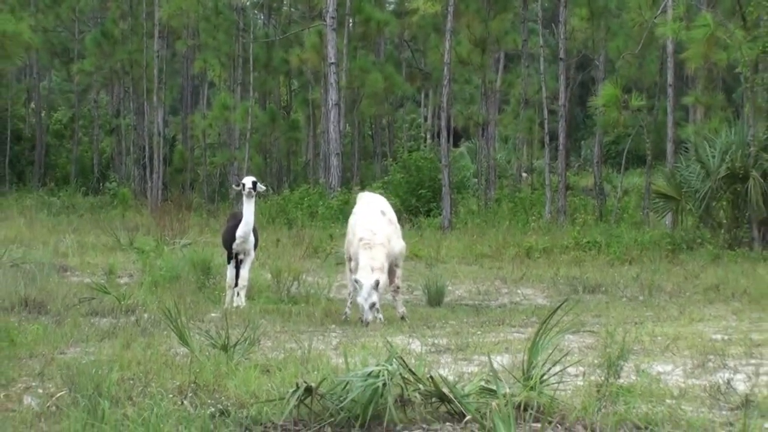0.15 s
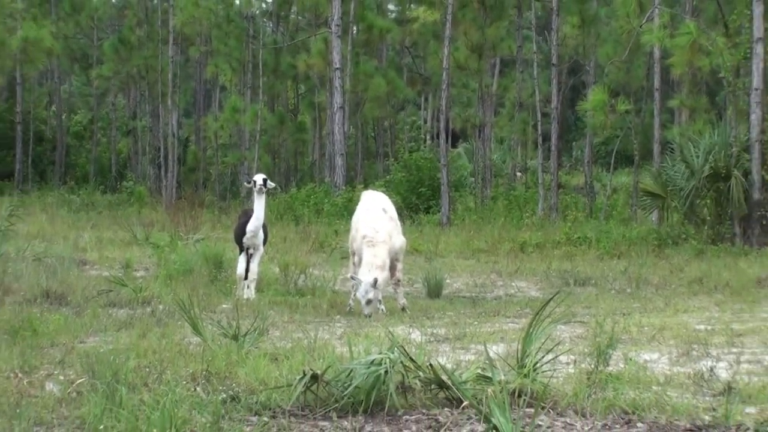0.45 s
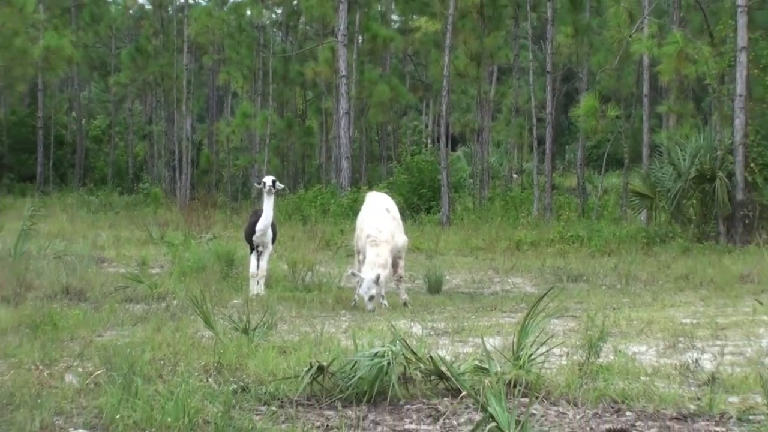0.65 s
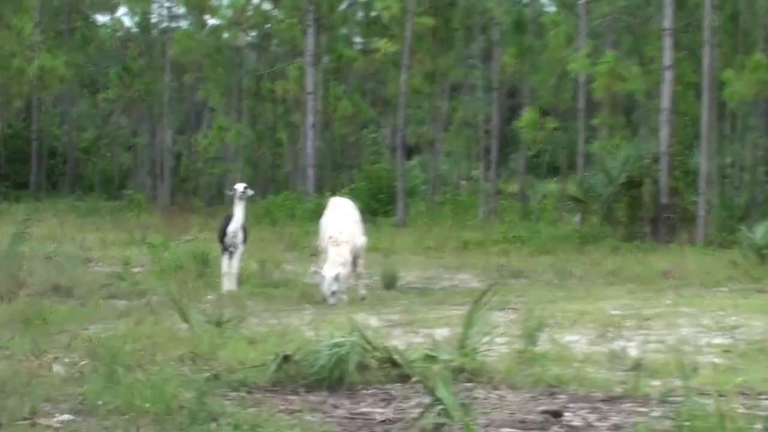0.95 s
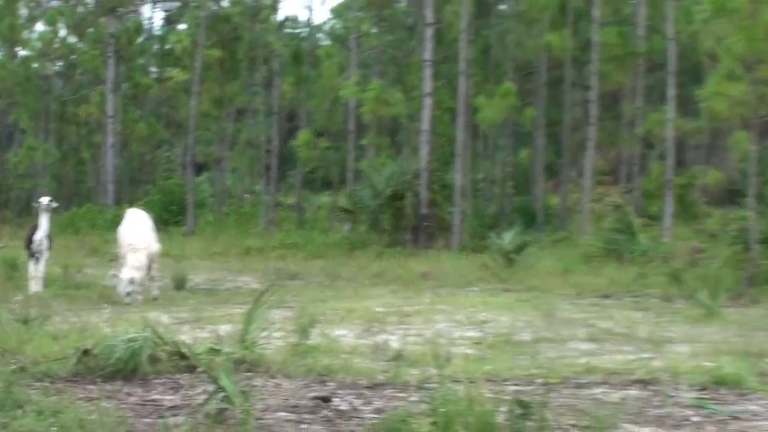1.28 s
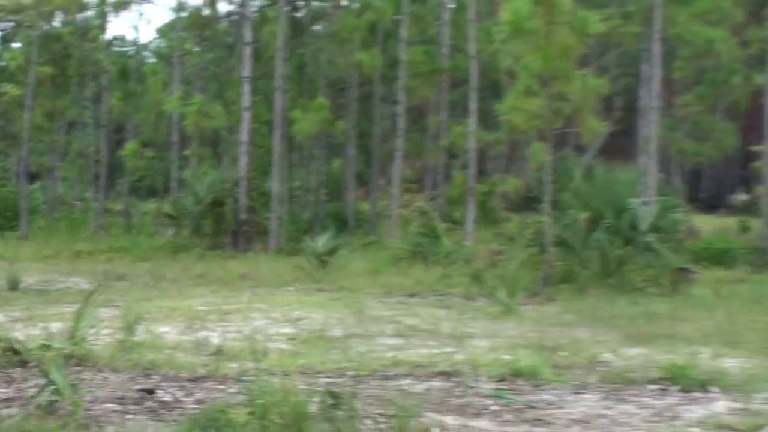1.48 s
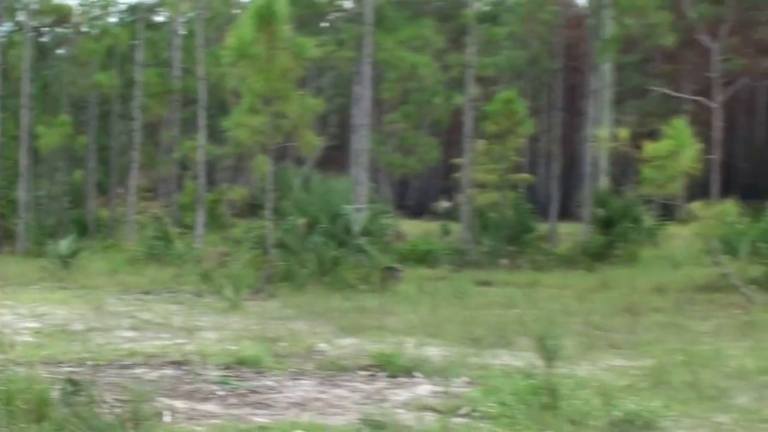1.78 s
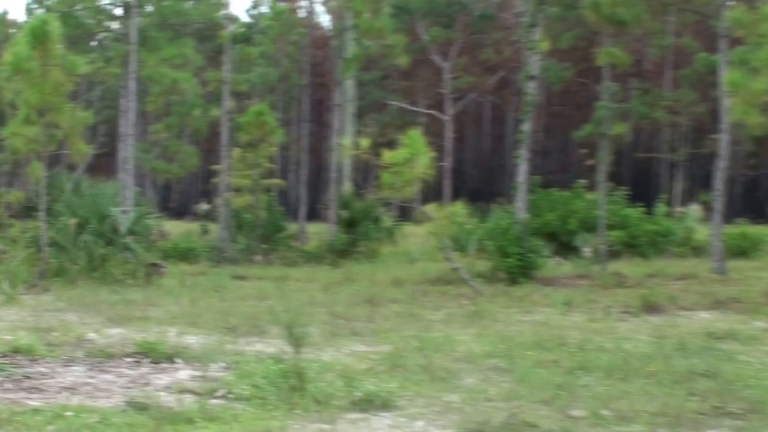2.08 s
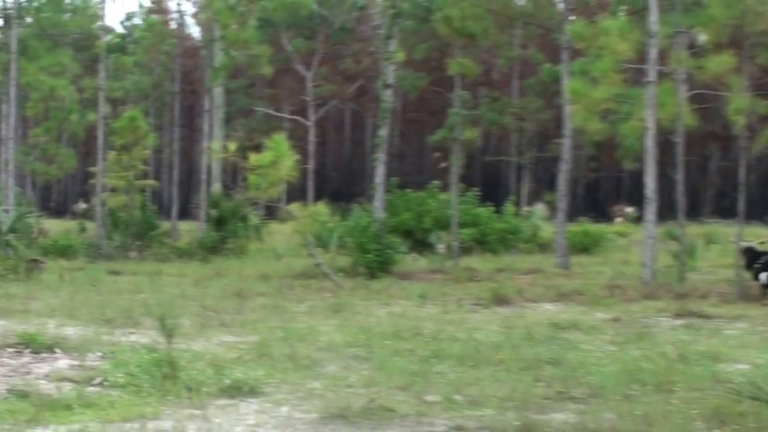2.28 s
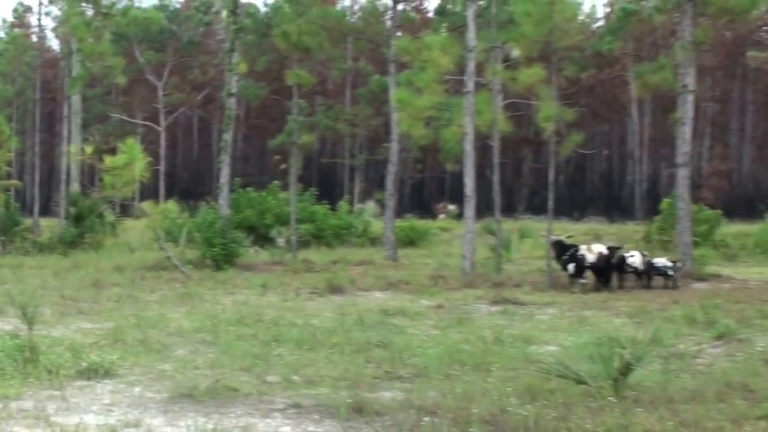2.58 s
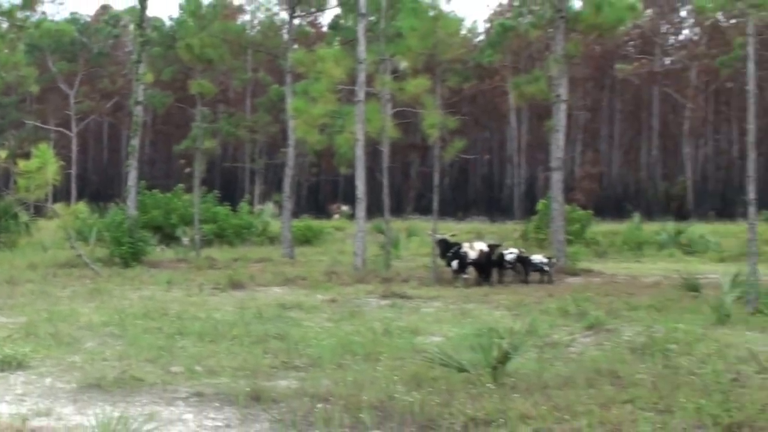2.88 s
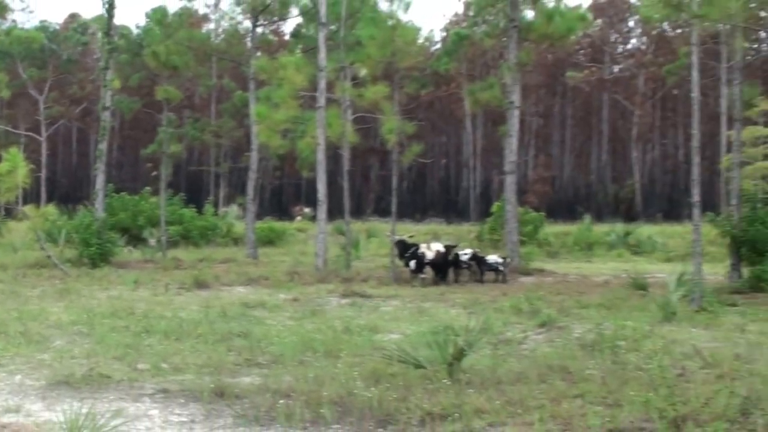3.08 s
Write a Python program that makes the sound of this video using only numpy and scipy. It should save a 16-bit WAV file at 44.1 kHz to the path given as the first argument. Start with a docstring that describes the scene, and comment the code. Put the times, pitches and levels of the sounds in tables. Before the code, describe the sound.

Shrill cicadas, two close over a distant chorus, fill an open grassy clearing beside woods. A handheld stereo microphone picks up finger taps, light wind rumble and one brief, hoarse bird call past the middle.

```python
"""Cicadas in pasture pines

Two near cicadas buzz over a far chorus, drifting from the left toward the middle as a hand-held camera turns:
ribs click about a hundred cycles a second and ring each body, while the chorus is patchy filtered noise.
A bird calls once, as sliding partials with an echo among the trunks. Fingers tick on the camera body as
ringing shell modes and rub the grip as banded noise. Light wind rumbles and thumps at the microphones
as low noise and short pulses, over the filtered-noise hush of the field."""
import sys
import numpy as np
from scipy import signal
from scipy.fft import rfft, irfft, next_fast_len
from scipy.io import wavfile
from scipy.ndimage import uniform_filter1d, map_coordinates

SR = 44100
rng = np.random.default_rng(int(sys.argv[2]) if len(sys.argv) > 2 else 0)


def store_pcm(level_fs):
    """Save levels as 16-bit WAV."""
    pcm = np.round(np.clip(level_fs, -1, 1) * 32767).astype(np.int16)
    wavfile.write(sys.argv[1], SR, np.atleast_2d(pcm).T)


N = 143325

# Near singers before the stereo lean; the high one breaks off and restarts. Each row: time in s, level in dB.
HIGH_LEVEL = [(0, -39), (.4, -38.5), (.535, -38.5), (.545, -62), (.95, -44), (1.15, -40), (1.8, -40.5),
              (2.6, -40), (2.9, -40), (3.05, -43), (3.25, -46)]
LOW_LEVEL = [(0, -42), (.15, -47.5), (.6, -44), (1.0, -40), (1.25, -39.5), (1.32, -41), (1.8, -39.5),
             (2.4, -38.5), (3.25, -41)]
# Rib cycles. Each row: time in s, cycles per second.
HIGH_RATE = [(0, 97.6), (.4, 97.6), (.54, 95.5), (.95, 97.0), (1.15, 98.47)]
LOW_RATE = [(0, 101.5)]
# Buckling ribs. Each row: place in the cycle as a share, relative level in dB.
HIGH_CLICKS = [(.42, 0), (.71, -1), (1.0, -9)]
LOW_CLICKS = [(.6, -1), (.8, 0), (1.0, -2)]
# Body resonances. Each row: centre in Hz, width in Hz, relative level in dB.
HIGH_BODY = [(11310, 180, -3), (12140, 320, -0.8), (9700, 1370, -4), (13100, 1040, -7.5)]
LOW_BODY = [(7832, 270, -0.5), (8680, 260, -2.5), (9360, 300, -0.5), (10260, 220, -4), (12700, 1100, -15),
            (15200, 460, -18.5), (7140, 240, -14.5)]
# Colour of the far chorus. Each row: frequency in Hz, relative density in dB per Hz.
CHORUS_COLOUR = [(3410, -62), (5800, -49), (6050, -24), (6540, -28), (7170, -9.5), (7570, -7.5),
                 (8330, -1.5), (9680, 0.5), (10400, -1), (10950, -2), (11450, -3), (11900, -6), (12600, -8),
                 (15100, -17), (15700, -13)]
# Far chorus before its wobble and the stereo lean. Each row: time in s, level in dB.
CHORUS_LEVEL = [(0, -37), (.5, -35.5), (1, -35.5), (1.3, -38), (1.9, -37), (2.6, -38), (3.25, -34.5)]
# Insects in the left and right channels; nearly the same signal in both above 11.3 kHz.
# Each row: frequency in Hz, likeness from 0 to 1.
INSECT_ALIKE = [(5800, 0.52), (7200, 0.71), (7900, 0.97), (8600, 0.48), (9600, 0.91), (10900, 0.58),
                (11300, 0.99)]
# Insects in the left and right channels. Each row: frequency in Hz, phase by which left leads in radians.
INSECT_LEAD = [(6000, 0.49), (7800, 0.77), (8900, 0.46), (10900, 1.35), (11300, 0.1)]
# The camera turns. Each row: time in s, insects left over right in dB below the treble.
CAMERA_TURN = [(0.0, 4), (0.04, 6.5), (1.28, 6.0), (2.96, 1.5), (3.25, 1)]
# The bird's call. Each row: time in s, fourth partial in Hz, effort in dB before the throat.
BIRD_CALL = [(1.635, 3110, -66), (1.645, 3233, -63), (1.668, 3365, -56), (1.69, 3350, -60),
             (1.706, 3346, -53), (1.73, 3305, -60), (1.751, 3303, -54), (1.783, 3247, -55),
             (1.82, 3165, -55), (1.867, 3080, -54.5), (1.882, 3040, -63)]
# Partials the bird sounds, as multiples of its pitch.
BIRD_PARTIALS = (2, 3, 4, 6)
# Throat resonances. Each row: frequency in Hz, gain in dB.
THROAT = [(1550, -13), (1680, -18), (2330, -14), (2520, -11), (3100, 5.5), (3240, 11), (3330, 4.5),
          (3400, -1.5), (4800, -30), (4950, -20), (5010, -16), (5070, -16)]
# Finger ticks. Each row: start in s, nominal level in dB, centre of the snap in Hz, knock level in dB,
# ring length as a share, left over right in dB, crack level in dB; knock and crack are relative to the tick.
TICKS = [(0.326, -28.5, 1480, -14, 1.12, 2.5, -3), (0.3915, -39, 1400, -15, 1.16, 2, 0),
         (1.1712, -33.5, 800, -6, .25, -3, -8), (1.181, -39, 900, -2, .2, -4, -8),
         (1.2263, -39.5, 3400, 6.5, 1.02, -5, 6), (1.72, -46.5, 910, 14.5, 0.81, -9, -12),
         (2.7907, -41.5, 950, -8, 0.75, -9, -4), (2.93, -52.5, 700, 8, .8, -10, -6),
         (3.048, -44, 1800, -20, 0.73, -9, -8)]
# Camera shell modes. Each row: frequency in Hz, mean relative level in dB, T60 in s at ring length 1.
SHELL = [(350, 8, 0.016), (630, 0, 0.0091), (754, 8, 0.016), (963, 3, 0.023), (1213, 0.5, 0.016),
         (1440, 1.5, 0.016), (1602, 2.5, 0.019), (1840, 0, 0.014), (2166, 1.5, 0.014), (2526, 0.5, 0.014),
         (3070, -1, 0.014), (3850, -1, 0.012), (4510, 3.5, 0.009), (5460, 0, .006)]
# Faint rubs at the grip. Each row: middle in s, half length in s, level in dB.
RUBS = [(0.408, .035, -59.5), (0.554, .03, -68), (0.766, 0.043, -65.5), (1.141, 0.042, -62),
        (1.27, 0.037, -68)]
# Wind thumps. Each row: middle in s, peak in dB before the pan, centre in Hz, left over right in dB.
THUMPS = [(.545, -43.5, 84, -1.5), (.8, -48.5, 65.4, 8), (1.93, -49, 45, -2), (1.965, -49, 75.6, -7),
          (2.059, -45.5, 101, -5), (2.095, -48, 55, -2), (2.22, -47.5, 81, 3), (2.39, -47.5, 60, -7)]
# Wind at the microphones. Each row: time in s, level in dB.
WIND_LEVEL = [(0.0, -62.5), (0.25, -60.5), (0.4, -65.5), (0.55, -57.5), (0.69, -62), (0.8, -60),
              (0.93, -63.5), (1.88, -62.5), (1.97, -55), (2.1, -58), (2.3, -63), (2.4, -57.5), (2.51, -67),
              (2.62, -59), (3.0, -67.5), (3.25, -59)]
# Colour of the wind rumble. Each row: frequency in Hz, relative density in dB per Hz.
RUMBLE_COLOUR = [(12, -9.5), (20, -9.5), (81, -4.5), (122, -4), (200, -23.5), (260, -37), (440, -120)]
# Wind in the left and right channels. Each row: frequency in Hz, likeness from 0 to 1.
WIND_ALIKE = [(100, .72)]
# Colour of the field hush. Each row: frequency in Hz, relative density in dB per Hz.
FIELD_COLOUR = [(88, -30), (150, -1), (538, -7.5), (601, -10), (682, -9), (3570, -16), (4670, -20),
                (5210, -17), (5730, -18.5), (6500, -7), (8450, -36), (14300, -120)]
# Hush and rubs in the left and right channels. Each row: frequency in Hz, likeness from 0 to 1.
FIELD_ALIKE = [(150, .76), (260, .8), (550, .42), (1100, .1), (2400, .3), (5000, .35)]

PATCHY_DB = 1.4  # far singers come and go, each in its own band
TREBLE_HZ, TREBLE_TURN = 11000, .68  # above this the insects lean by this share of the turn
BIRD_PAN_DB, BIRD_LEAD_RAD = 4.5, 0.4  # left over right, left ahead of right
BIRD_ECHO_DB, BIRD_T60_S = -9.5, 1
BIRD_WALL_S, BIRD_WALL_DB = 0.06, -10.5  # the edge of the wood answers once
HOARSE, FLUTTER_DB = .006, 2.2  # pitch jitter share, level flutter
BURR_HZ, BURR_DEPTH, BURR_FROM_S, BURR_RISE_S = 140, .25, 1.72, .04  # roughens the later call
KNOCK_HZ, KNOCK_T60_S, CRACK_T60_S = 498, 0.03, 0.011  # knock T60 at ring length 1
SNAP_DB_PER_OCT2 = 4.5  # modes weaken with squared octaves from the snap
RISE_CYCLES, CRACK_LOW_HZ, CRACK_TOP_HZ = 0.85, 900, 5860  # low modes build up later than high ones
PHASE_SCATTER_RAD = .45  # mode by mode
PORT_TURN_RAD = .7  # the left microphone leads and the right lags by this much
RUB_HZ, RUB_WIDTH_HZ = 2100, 390
THUMP_CYCLES = 0.68  # half length of a thump
FIELD_DB = -57.5  # level the hush wobbles about
TOP_HZ = 15750
T = np.arange(N) / SR
LEFT_RIGHT = np.array([[1], [-1]])


def amp(db):
    """Amplitude for a level in dB."""
    return 10 ** (np.asarray(db) / 20)


def unit(x):
    """Scale to rms 1."""
    return x / np.sqrt(np.mean(x ** 2) + 1e-20)


def along(points, hz):
    """Read (Hz, value) points on a log frequency axis."""
    f, v = np.transpose(points)
    return np.interp(np.log(hz + 1), np.log(f + 1), v)


def curves(rows):
    """One value per sample for each column after the time."""
    s, *cols = np.transpose(rows)
    return [np.interp(T, s, c) for c in cols]


def wobble(rate):
    """A smooth random curve, rate knots a second."""
    knots = rng.standard_normal(int(N * rate / SR) + 4)
    return map_coordinates(knots, [T * rate])


def stereo_noise():
    """Unrelated white noise for the left and right channels."""
    return rng.standard_normal((2, N))


def filtered(x, response):
    """x times a complex response of frequency."""
    m = next_fast_len(N + SR // 2)
    hz = np.fft.rfftfreq(m, 1 / SR)
    return irfft(rfft(x, m) * response(hz), m)[..., :N]


def spread(pair, colour, alike, lead=((1, 0),)):
    """Mix two unrelated signals into left and right of given colour, likeness and phase lead; rms 1."""
    def mid_side(hz):
        angle = np.arccos(np.clip(along(alike, hz), -1, 1)) / 2
        return colour(hz) * np.array([np.cos(angle), np.sin(angle)])

    mid, side = filtered(pair, mid_side)
    left_right = np.array([mid + side, mid - side])
    return unit(filtered(left_right, lambda hz: np.exp(.5j * LEFT_RIGHT * along(lead, hz))))


def singer(level, rate, clicks, body, jitter_s, rasp, rasp_s):
    """Each cycle a few ribs buckle: sharp clicks, each trailing a short rasp, ring the body."""
    cycle = np.cumsum(curves(rate)[0]) / SR
    turns = np.arange(int(cycle[-1]) - 1)
    place, click_db = np.transpose(clicks)
    pulses = np.zeros((2, N + SR))
    for ear in range(2):
        click_s = np.interp(turns[:, None] + place, cycle, T)
        click_s = click_s + jitter_s * rng.standard_normal(click_s.shape)
        start = np.round(click_s * SR).astype(int).clip(0)
        np.add.at(pulses[ear], start.ravel(), np.tile(amp(click_db), len(turns)))
    pulses = pulses[:, :N]

    t = T[:SR // 100] / rasp_s
    gate = signal.fftconvolve(pulses[:1], (t * np.exp(-t))[None], axes=1)[:, :N]
    drive = unit(pulses - pulses.mean()) + rasp * unit(gate * stereo_noise())

    def body_ring(f):
        modes = 0
        for k, (centre, width, db) in enumerate(body):
            sign = (-1) ** k  # signs alternate in table order
            modes = modes + sign * amp(db) * 1j * f * width / (centre ** 2 - f * f + 1j * f * width)
        return modes / np.sqrt(1 + (6900 / (f + 1)) ** 24)  # steep low cut

    return amp(curves(level)[0]) * spread(drive, body_ring, INSECT_ALIKE, INSECT_LEAD)


def far_chorus():
    """Many distant singers blur into coloured noise whose bands swell and fade in patches."""
    noise = amp(0.59 * wobble(300)) * stereo_noise()
    colour = lambda hz: amp(along(CHORUS_COLOUR, hz)) * (hz > 5700)
    far = spread(noise, colour, INSECT_ALIKE, INSECT_LEAD)
    z = signal.stft(far, nperseg=512)[2]
    patches = uniform_filter1d(rng.standard_normal(z.shape[1:]), size=7, axis=0)  # across frequency
    patches = uniform_filter1d(patches, size=30, axis=1)  # across time
    far = unit(signal.istft(z * amp(PATCHY_DB * unit(patches)), nperseg=512)[1][:, :N])
    return far * amp(curves(CHORUS_LEVEL)[0] + 0.45 * wobble(5.02))


def cicadas():
    """Near singers and far chorus drift toward the middle as the camera turns; the treble leans less."""
    high = singer(HIGH_LEVEL, HIGH_RATE, HIGH_CLICKS, HIGH_BODY, jitter_s=.00012, rasp=0.71, rasp_s=0.00078)
    low = singer(LOW_LEVEL, LOW_RATE, LOW_CLICKS, LOW_BODY, jitter_s=.00015, rasp=0.69, rasp_s=0.00046)
    insects = far_chorus() + high + low
    treble = filtered(insects, lambda hz: hz > TREBLE_HZ)
    lean_db = .5 * LEFT_RIGHT * curves(CAMERA_TURN)[0]
    return (insects - treble) * amp(lean_db) + treble * amp(TREBLE_TURN * lean_db)


def bird():
    """A thin, hoarse falling call: partials slide through throat resonances and echo among the trunks."""
    hz, effort_db = curves(BIRD_CALL)
    gate = np.clip(np.minimum(T - BIRD_CALL[0][0], BIRD_CALL[-1][0] - T) / .006, 0, 1)
    pitch = hz / BIRD_PARTIALS[2]  # the table follows the fourth partial
    phase = 2 * np.pi * np.cumsum(pitch * (1 + HOARSE * wobble(300))) / SR
    burr_phase = 2 * np.pi * BURR_HZ * np.cumsum(1 + 0.151 * wobble(40)) / SR
    burr_rise = np.clip((T - BURR_FROM_S) / BURR_RISE_S, 0, 1)
    burr = 1 + BURR_DEPTH * burr_rise * np.sin(burr_phase)  # a second vibration
    call = np.zeros(N)
    for k in BIRD_PARTIALS:
        partial_db = effort_db + along(THROAT, k * pitch) + FLUTTER_DB * wobble(120)
        call += amp(partial_db) * np.sin(k * phase)
    call *= gate * burr

    tail = rng.standard_normal((2, SR)) * amp(-60 * T[:SR] / BIRD_T60_S)
    echo = signal.fftconvolve(call[None], tail / np.linalg.norm(tail[0]), axes=1)[:, :N]
    near = filtered(call, lambda f: np.exp(.5j * BIRD_LEAD_RAD * LEFT_RIGHT) + 0 * f)
    wall = np.roll(call, round(BIRD_WALL_S * SR))
    return near * amp(LEFT_RIGHT * BIRD_PAN_DB / 2) + amp(BIRD_ECHO_DB) * echo + amp(BIRD_WALL_DB) * wall


def shell_mode(t, hz, db, t60):
    """One mode builds up and dies away, its level and phase differing at the two microphones."""
    decay = amp(db + rng.normal(0, 2.1, (2, 1)) - 60 * t / t60)
    rise = 1 - np.exp(-t * hz / RISE_CYCLES)
    phase = rng.normal(0, PHASE_SCATTER_RAD) + PORT_TURN_RAD * LEFT_RIGHT
    return decay * rise * np.sin(2 * np.pi * hz * t + phase)


def ticks():
    """Each finger touch cracks, rings mostly the shell modes near its snap and knocks the grip."""
    out, t = np.zeros((2, N + SR)), T[:SR // 10]
    crack_band = signal.butter(2, [CRACK_LOW_HZ, CRACK_TOP_HZ], "bandpass", fs=SR, output="sos")
    for s, db, centre_hz, knock_db, length, pan_db, crack_db in TICKS:
        ring = 0
        for hz, level, t60 in SHELL:
            snap_db = level - SNAP_DB_PER_OCT2 * np.log2(hz / centre_hz) ** 2
            ring = ring + shell_mode(t, hz, snap_db, t60 * length)
        grit = signal.sosfilt(crack_band, rng.standard_normal((2, len(t))))
        crack = amp(crack_db - 60 * t / CRACK_T60_S) * (1 - np.exp(-t / 0.00063)) * grit
        knock = shell_mode(t, KNOCK_HZ, knock_db, KNOCK_T60_S * length)
        gain = amp(db - 3.5 + .5 * LEFT_RIGHT * pan_db)
        out[:, round(s * SR):][:, :len(t)] += gain * (ring + crack + knock)
    return out[:, :N]


def rubs():
    """Soft grainy rubs at the grip: one resonant band of noise swells and fades."""
    strokes = sum(amp(db) * np.exp(-((T - s) / half) ** 2) for s, half, db in RUBS)
    grains = amp(2.5 * wobble(120)) * stereo_noise()
    band = lambda f: 1j * f * RUB_WIDTH_HZ / (RUB_HZ ** 2 - f * f + 1j * f * RUB_WIDTH_HZ)
    return strokes * spread(grains, band, FIELD_ALIKE)


def wind_thumps():
    """Single eddies push the microphones for a cycle or two."""
    out = np.zeros((2, N))
    for s, db, hz, pan_db in THUMPS:
        phase = rng.normal(0, .4, (2, 1))
        swell = np.exp(-((T - s) * hz / THUMP_CYCLES) ** 2)
        out += amp(db + .5 * LEFT_RIGHT * pan_db) * swell * np.cos(2 * np.pi * hz * (T - s) + phase)
    return out


def wind():
    """Light wind rumbles on the microphones as lumpy low noise."""
    lumps = amp(1.8 * wobble(14)) * stereo_noise()
    colour = lambda hz: amp(along(RUMBLE_COLOUR, hz)) * (hz < 160)
    return amp(curves(WIND_LEVEL)[0]) * spread(lumps, colour, WIND_ALIKE)


def field_hush():
    """The hush of the field: coloured noise with a gently wobbling level."""
    colour = lambda hz: amp(along(FIELD_COLOUR, hz)) * (hz > 150) * (hz < 6500)
    return amp(FIELD_DB + 1.31 * wobble(5.26)) * spread(stereo_noise(), colour, FIELD_ALIKE)


def scene():
    """All sources, from the near insects to the hush of the field."""
    return cicadas() + bird() + ticks() + rubs() + wind_thumps() + wind() + field_hush()


def record(dry):
    """The camera keeps nothing above its band limit."""
    return filtered(dry, lambda hz: hz < TOP_HZ)


dry = scene()
out = record(dry)
store_pcm(out)
```